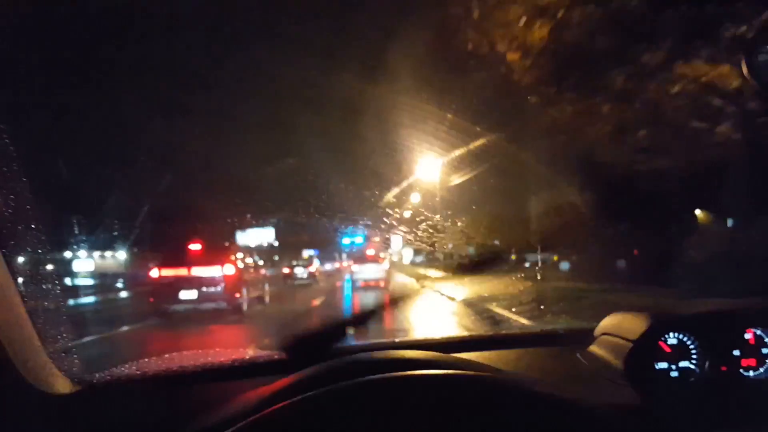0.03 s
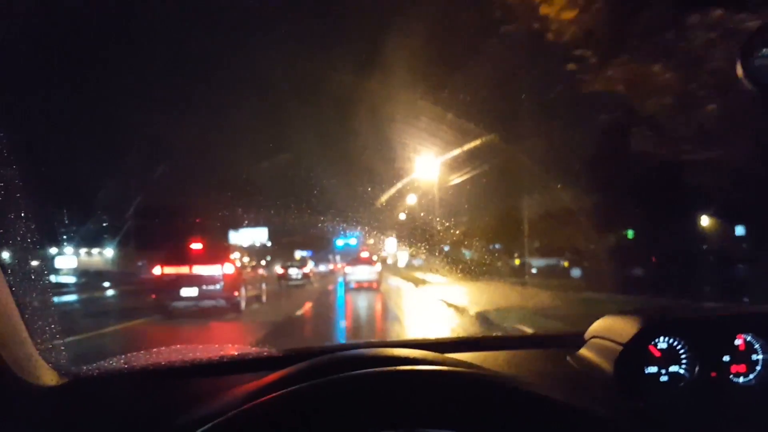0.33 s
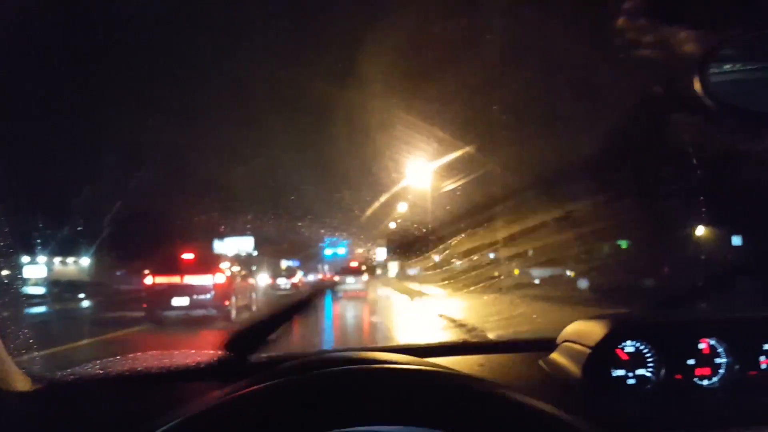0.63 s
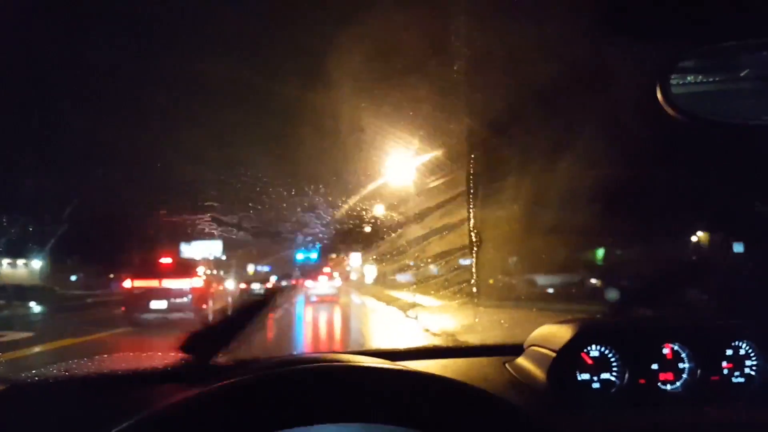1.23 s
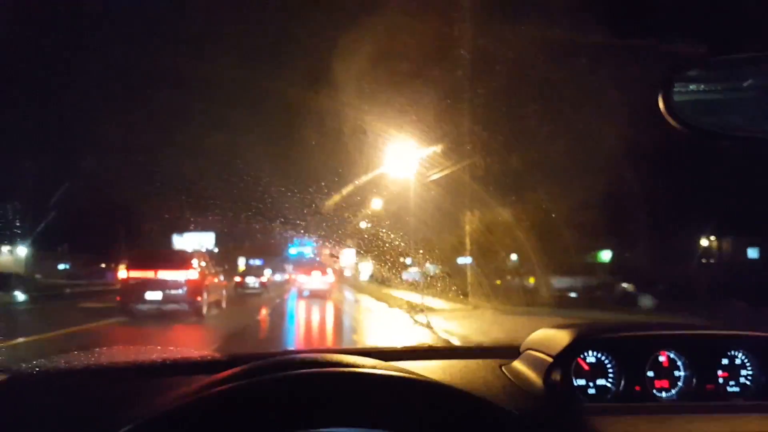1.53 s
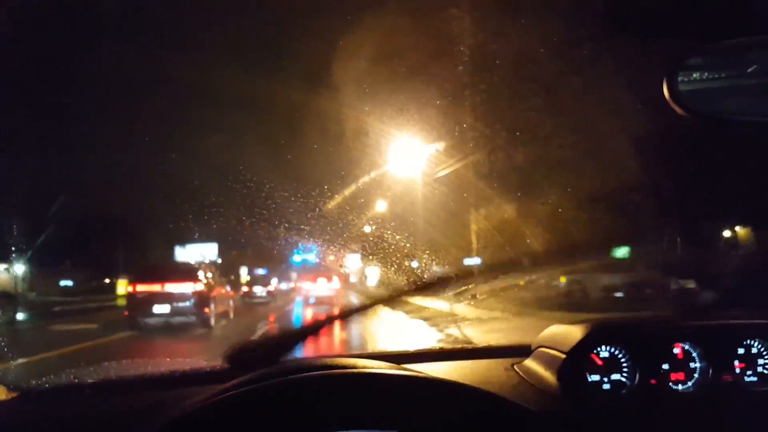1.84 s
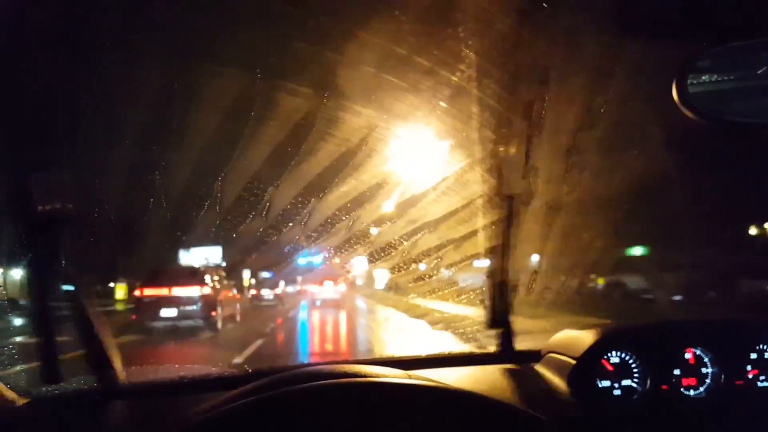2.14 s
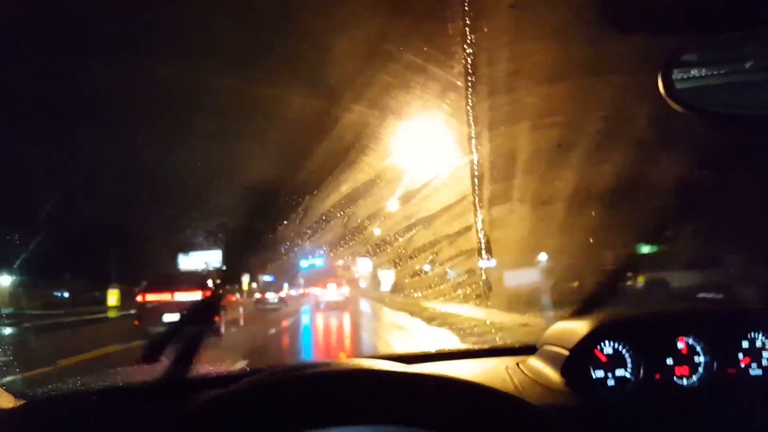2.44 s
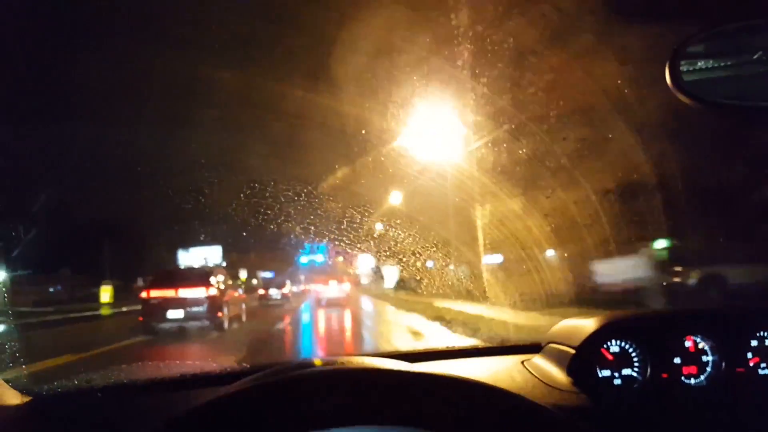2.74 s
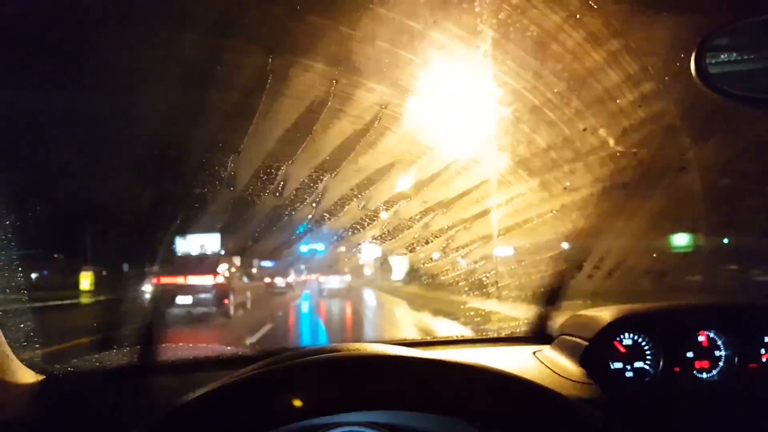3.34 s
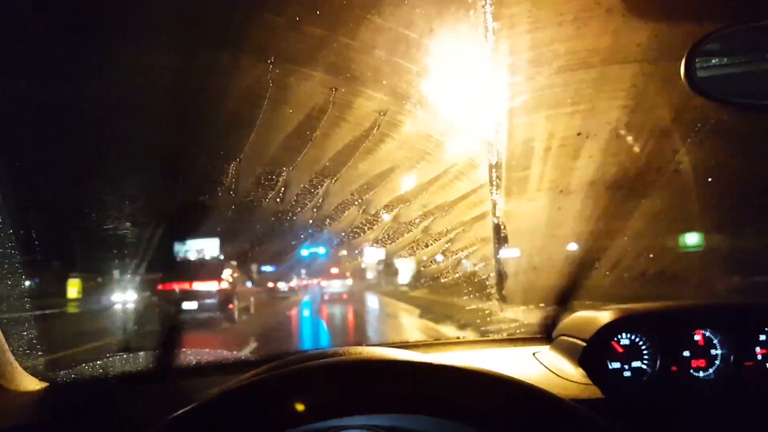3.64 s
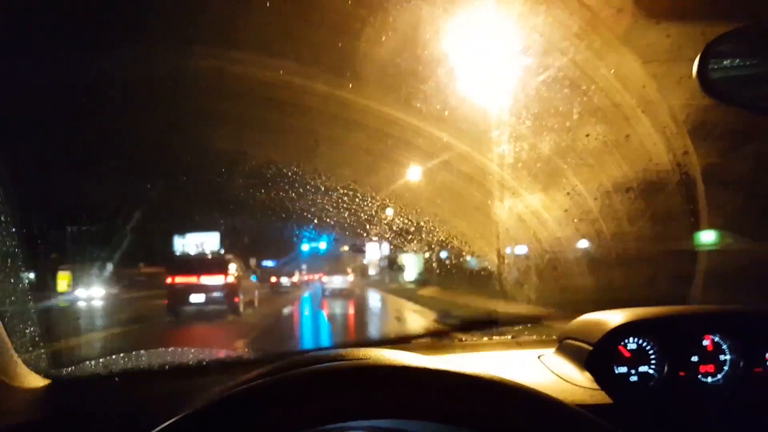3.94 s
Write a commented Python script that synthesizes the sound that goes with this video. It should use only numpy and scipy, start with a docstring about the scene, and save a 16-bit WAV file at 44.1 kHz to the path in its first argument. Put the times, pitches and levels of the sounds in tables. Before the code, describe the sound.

Wiper blades judder, hiss and thud across a wet windshield inside a moving car.

```python
"""Windshield wipers at arm's length, on a stereo microphone inside a car rolling slowly on a wet road.
Three sweeps, louder on the left: the rubber breaks loose with a stick-slip judder, hisses up the wet
glass, flutters, and thuds as the blades flip over at the top; the way back is almost silent.
Small squelches and water ticks lie between. Farther off, the engine's firing note drones and the
tyres rumble through the body. The sound fades in at the start."""
import sys
import numpy as np
from scipy import signal
from scipy.fft import rfft, irfft, next_fast_len
from scipy.io import wavfile
from scipy.ndimage import map_coordinates

SR = 44100
rng = np.random.default_rng(int(sys.argv[2]) if len(sys.argv) > 2 else 0)


def output_pcm(signal):
    """Save a mono or channel-first signal as 16-bit PCM at the path in sys.argv[1].

    Samples are clipped to [-1, 1] before scaling.
    """
    pcm = np.clip(np.atleast_2d(signal).T, -1, 1) * 32767
    wavfile.write(sys.argv[1], SR, np.round(pcm).astype(np.int16))


N = 176400
T = np.arange(N) / SR

# Sweeps across the glass in front of the microphone: start_s, gain_db
SWEEPS = [(.483, -0.5), (1.75, -1.5), (3.022, -1.5)]
# Rubbing along one sweep: after_start_s, hiss_gain_db, rub_gain_db
STROKE = [(-.04, -28, -12), (0, -12.5, -2.5), (.014, -1, 6), (.09, -6, 1.5), (.18, -7, 3.5),
          (.215, -3.5, 4), (.32, -4.5, 5.5), (.43, -9.5, 4), (.5, -6, 3), (.55, -2, 8.5), (.6, -15.5, 2.5),
          (.66, -24, -5.5), (.85, -24, -22.5)]
# The blade's lip sings downward as it gathers speed: after_start_s, length_s, from_hz, to_hz,
# width_hz, level_db
SWISHES = [(.008, .12, 3400, 2300, 1310, -42.5), (.19, .13, 2691, 1555, 523, -44),
           (0.331, .15, 2800, 2290, 650, -49)]
# Wet hiss and low rub of rubber on glass: frequency_hz, gain_db
HISS_SPECTRUM = [(300, -31), (900, 8.5), (1400, 3.5), (2000, 1), (2900, -2), (4000, -6), (6500, -12),
                 (8500, -21), (9800, -19.5), (11000, -30.5), (15500, -29.5)]
RUB_SPECTRUM = [(40, -23.5), (90, -1.5), (140, 2), (200, -1.5), (255, -10), (340, -8.5), (550, -11.5),
                (850, -21), (1020, -25.5), (1400, -26.5), (3000, -69)]
def rubbing():
    """Close up, the blades drag up wet glass: hiss, grit and a low rub, fluttering near the top."""
    flutter_hz, flutter_db, grits_per_s = 26.6, 2.5, 2000
    hiss_gain, rub_gain, swish = np.zeros(N), np.zeros(N), np.zeros((2, N))
    for start, db in SWEEPS:
        hiss_db, rub_db = curves(STROKE, start)
        crest = start + .42
        flutter = flutter_db * bell(crest, .06) * np.cos(2 * np.pi * flutter_hz * (T - crest))
        moving = amp(db) * gate(start - .1, 1.13, edge_s=.017)
        hiss_gain += moving * amp(hiss_db + flutter)
        rub_gain += moving * amp(rub_db + flutter / 2)
        for after, length, from_hz, to_hz, width_hz, level_db in SWISHES:
            glide = np.interp(T - start - after, [0, length], [from_hz, to_hz])
            swell = amp(db + level_db) * gate(start + after, length, edge_s=.0082)
            swish += swell * sing(glide, width_hz)
    drag = amp(1.67 * wobble(110))
    grit = (rng.random(N) < grits_per_s / SR) * rng.standard_normal((2, N))
    wet = amp(-36) * rush(HISS_SPECTRUM) + amp(-47) * spread(grit, HISS_SPECTRUM) + amp(-42) * chirps()
    rub = amp(-31.5) * rush(RUB_SPECTRUM)
    return drag * (hiss_gain * wet + swish + rub_gain * rub)


def chirps(per_s=190, centre_hz=2356, scatter_octaves=.25, width_s=.0031):
    """Tiny squeaks within the hiss, where the rubber catches on drier spots."""
    out, t = np.zeros((2, N + SR)), np.arange(SR // 30) / SR
    draws = np.c_[rng.random((2000, 3)), rng.standard_normal((2000, 2))]
    for when, phase_l, phase_r, pitch, loud in draws[:int(per_s * N / SR)]:
        hz = centre_hz * 2 ** (scatter_octaves * pitch)
        swell = amp(3.5 * loud) * np.exp(-.5 * ((t - t.mean()) / width_s) ** 2)
        cycles = hz * t + np.array([[phase_l], [phase_r]])
        at = int(when * N)
        out[:, at:at + len(t)] += swell * np.sin(2 * np.pi * cycles)
    return unit(out[:, :N])


# Resonances of the wiper arms, just outside the glass: pitch_hz, width_hz, gain_db
ARM_MODES = [(101.5, 28.6, 3.5), (186, 37.4, 1), (451.6, 167, -18)]
# Scrape of the rubber edge: frequency_hz, gain_db
SCRAPE_SPECTRUM = [(120, -21), (330, 1), (600, 6), (1050, 1), (1500, -15), (3000, -34.5), (7000, -22.5),
                   (15000, -52)]
def judder(slip_hz=57, length_s=.22):
    """The blades break loose with a kick, then stutter and shake the arms."""
    pulses, kick, scrape = np.zeros((3, N))
    for start, db in SWEEPS:
        loose = start + .01
        train = slips(loose + 1 / slip_hz, length_s, slip_hz, scatter=.14, uneven_db=2.5)
        pulses += amp(db) * train * amp(-14 * np.abs(T - start))
        kick[round(loose * SR)] = amp(db)
        scrape += amp(db - 30) * dying(loose, t60_s=.07)
    active_share = len(SWEEPS) * length_s * SR / N
    stutter = amp(-24.5) * unit(ring(pulses, ARM_MODES)) * np.sqrt(active_share)
    thump = ring(kick, ARM_MODES)
    return stutter + amp(-13) * thump / np.abs(thump).max() + scrape * rush(SCRAPE_SPECTRUM)


# Blades flipping at the top of the glass: start_s, length_s, level_db, slip_hz
FLIPS = [(.95, 0.05, -21, 180), (1.015, 0.031, -21.5, 175), (1.059, 0.039, -22.5, 345),
         (2.222, 0.035, -17.5, 160), (2.28, 0.025, -21, 170), (2.312, 0.035, -16.5, 160),
         (3.494, 0.029, -16.5, 173), (3.562, .035, -14, 173), (3.597, .024, -20, 330)]
# Resonances of the windshield: pitch_hz, width_hz, gain_db
GLASS_MODES = [(157.6, 26, 0), (192, 28.6, -0.5), (304, 32.5, -4.5), (358, 59, -12.5), (452, 39, -11),
               (617, 94, -21.5), (1052, 69, -22)]
# After-ring of the dashboard, below the microphone: frequency_hz, gain_db
DASHBOARD_SPECTRUM = [(100, -29), (170, 15.5), (240, -5), (320, -1.5), (480, -15), (700, -26.5),
                      (1500, -50)]
def flips():
    """Each blade rolls over its edge in a burst of slips that booms in the windshield."""
    pulses, force, tail = np.zeros((3, N))
    for start, length, db, hz in FLIPS:
        pulses += amp(db) * slips(start, length, hz, scatter=.08, uneven_db=.7) / np.sqrt(hz)
        force += amp(db) * gate(start, length, edge_s=.01)
        tail += amp(db - 11) * dying(start + length / 2, t60_s=.28)
    boom = unit(ring(pulses, GLASS_MODES)) * np.sqrt(np.mean(force ** 2))
    return boom + amp(-16.5) * force * rush(SCRAPE_SPECTRUM) + tail * rush(DASHBOARD_SPECTRUM)


# Small squelches on the glass: peak_s, width_s, tone_db, pitch_hz, hiss_db
SQUELCHES = [(1.098, 0.014, -55, 2967, -45), (1.162, 0.0085, -54, 2685, -47.5),
             (1.213, 0.0091, -45.5, 2300, -49.5), (1.656, 0.0096, -46, 2525, -49.5),
             (1.694, 0.0093, -59, 2980, -59), (1.835, .008, -42.5, 3320, -56.5),
             (1.953, 0.0081, -44, 2550, -57.5), (2.425, 0.0085, -66, 2400, -44.5),
             (2.472, 0.01, -53, 2305, -45.5), (2.925, 0.0098, -42.5, 2602, -43),
             (3.098, 0.0044, -32.5, 2876, -53), (3.647, 0.011, -48.5, 2900, -42)]
def squelches(sag_hz_per_s=24000, width_hz=570):
    """The wet rubber catches briefly, each catch sliding down in pitch."""
    tone, hiss, glide = np.zeros((3, N))
    for peak, width, tone_db, hz, hiss_db in SQUELCHES:
        sag = sag_hz_per_s * np.clip(T - peak, -2 * width, 2 * width)
        glide = np.where(T > peak - 3 * width, hz - sag, glide)
        tone += amp(tone_db) * bell(peak, width)
        hiss += amp(hiss_db) * bell(peak, width)
    voice = sing(glide, width_hz) + amp(-13.5) * sing(2 * glide, width_hz)
    return tone * voice + hiss * rush(HISS_SPECTRUM)


# Knocks at the foot of the windshield: start_s, level_db
KNOCKS = [(1.648, -33.5), (2.921, -33.5)]
def knocks():
    """The arms knock softly and ring as they turn at the bottom."""
    return sum(amp(db) * dying(start, t60_s=.1) for start, db in KNOCKS) * sing(1100, width_hz=140)


# Water ticks, close on the glass: start_s, level_db, centre_hz, width_octaves
TICKS = [(.69, -44, 6000, .5), (.815, -40.5, 6500, .5), (.828, -45, 7050, 0.48), (1.092, -43.5, 6050, 0.31),
         (1.506, -36, 2300, .6), (1.578, -57, 7000, .4), (1.594, -52, 6500, .4), (1.801, -50, 6000, 0.29),
         (1.84, -52, 7000, 0.63), (1.954, -37, 6000, 0.52), (1.976, -41, 5960, .6),
         (2.021, -43, 6500, 0.31), (2.0767, -39.5, 7000, .7), (2.338, -50, 5900, .6),
         (2.864, -52, 6400, .35), (2.888, -51.5, 6560, 0.42), (3.073, -44, 5500, 0.31),
         (3.224, -40.5, 6500, 0.45), (3.2474, -42.5, 6474, 0.46), (3.602, -41, 6000, 0.33),
         (3.6415, -42, 4950, 0.43)]
def ticks(t60_s=.013):
    """Drops snap under the blades, each a fast-dying band of noise."""
    out, size = np.zeros((2, N + SR)), 4096
    t, f = np.arange(size) / SR, np.fft.rfftfreq(size, 1 / SR) + 1
    for start, db, hz, octaves in TICKS:
        band = np.exp(-.5 * (np.log2(f / hz) / octaves) ** 2)
        snap = unit(irfft(rfft(rng.standard_normal((2, size))) * band))
        at = round(start * SR)
        out[:, at:at + size] += amp(db) * 1000 ** (-t / t60_s) * snap
    return out[:, :N]


# A faint puff of spray outside: peak_s, width_s, level_db
SPRAY = [(2.413, 0.023, -55)]
# Its bright colour: frequency_hz, gain_db
SPRAY_SPECTRUM = [(2000, -20), (5000, 4), (9000, 0), (14000, -3), (16000, -19)]
def spray():
    """Water thrown off the blade hisses for a moment."""
    return sum(amp(db) * bell(peak, width) for peak, width, db in SPRAY) * rush(SPRAY_SPECTRUM)


# Drone from beyond the dashboard, centred between the channels: time_s, level_db
ENGINE_LEVEL = [(.7, -28.5), (.8, -24.5), (.95, -32), (1.3, -30.5), (1.45, -30), (1.96, -31), (2.06, -28.5),
                (2.26, -30.5), (3.0, -26), (3.39, -31.5), (3.67, -26.5), (4.0, -31.5)]
# Firing rate: time_s, pitch_hz
FIRING_PITCH = [(1.3, 46.5), (1.45, 47.75), (1.96, 48.23), (2.06, 46)]
# Overtones of the firing note: multiple, gain_db
OVERTONES = [(2, -17), (3, -18.5)]
def engine():
    """The firing note booms in the cabin, never quite even, with weak, unsteady overtones."""
    (db,), (hz,) = curves(ENGINE_LEVEL), curves(FIRING_PITCH)
    phase = 2 * np.pi * np.cumsum(hz * (1 + .0082 * wobble(13))) / SR
    upper = sum(amp(gain_db + 5.3 * wobble(12)) * np.sin(k * phase + .84 * wobble(9))
                for k, gain_db in OVERTONES)
    return np.sqrt(2) * amp(db + 1.5 * wobble(20)) * (np.sin(phase) + upper)


# Tyres on the wet road, heard from inside: frequency_hz, gain_db
ROAD_SPECTRUM = [(40, -19), (70, -10.5), (98, 2), (125, -1.5), (165, -0.5), (195, -7), (240, -15.5),
                 (300, -15.5), (390, -18.5), (450, -23.5), (660, -25), (790, -23), (900, -27.5),
                 (1550, -37.5), (2600, -42), (6000, -52.5), (15000, -71)]
# Rise and fall of the rumble, scaled down by swell_depth: time_s, contour_db
ROAD_SWELL = [(0.8, -30), (2.35, -25), (2.71, -39), (3.39, -18.5), (4.0, -38.5)]
def road(swell_depth=.26):
    """Tyre rumble and faint wet hiss come through the body, a little to the left."""
    contour_db, = curves(ROAD_SWELL)
    bass_cut = [(20, -9), (67, -4), (100, 0)]  # frequency_hz, gain_db
    rumble = unit(filtered(rush(ROAD_SPECTRUM), lambda hz: amp(along(bass_cut, hz))))
    level_db = -28 + swell_depth * (contour_db - contour_db.mean()) + 1.5 * wobble(9)
    return amp([[.5], [-.5]]) * amp(level_db) * rumble


# How alike the cabin sounds on the microphone's two sides: frequency_hz, correlation
CABIN_LIKENESS = [(60, 1), (150, 0.98), (300, 0.84), (600, 0.76), (1200, 0), (2500, 0.082), (8000, 0)]
def spread(pair, spectrum):
    """Two unrelated signals coloured and mixed to the cabin's stereo width."""
    def response(hz):
        angle = np.arccos(np.clip(along(CABIN_LIKENESS, hz), -1, 1)) / 2
        return amp(along(spectrum, hz)) * [np.cos(angle), np.sin(angle)]
    mid, side = filtered(pair, response)
    return unit(np.array([mid + side, mid - side]))


def rush(spectrum):
    """Coloured stereo noise of rms 1."""
    return spread(rng.standard_normal((2, N)), spectrum)


def slips(start, length, hz, scatter, uneven_db):
    """Uneven stick-slip pulses of rubber on glass."""
    k = np.arange(int(length * hz) + 1)
    late, loud = rng.standard_normal((100, 2))[k].T
    times = start + (k + scatter * late) / hz
    return np.bincount(np.clip(times * SR, 0, N - 1).astype(int), amp(uneven_db * loud), N)


def ring(pulses, modes, rubber_hz=1500):
    """Pulses, dulled by the soft rubber, pass through a body's resonances."""
    def body(f):
        return sum((-1) ** k * amp(db) * 1j * f * width / (hz * hz - f * f + 1j * f * width)
                   for k, (hz, width, db) in enumerate(modes))
    return filtered(pulses, lambda f: body(f) / (1 + 1j * f / rubber_hz) ** 2)


def sing(hz, width_hz):
    """A rough resonance: a band of noise that follows a pitch."""
    phase = 2 * np.pi * np.cumsum(hz + 0 * T) / SR
    lowpass = signal.butter(2, width_hz / 2, fs=SR, output="sos")
    a, b = signal.sosfilt(lowpass, rng.standard_normal((2, 2, N)))
    return unit(a * np.cos(phase) + b * np.sin(phase))


def filtered(x, response):
    """x times a complex response of frequency."""
    size = next_fast_len(N + SR // 2)
    return irfft(rfft(x, size) * response(np.fft.rfftfreq(size, 1 / SR)), size)[..., :N]


def amp(db):
    """Decibels to gain."""
    return 10 ** (np.asarray(db) / 20)


def unit(x):
    """Scaled to rms 1."""
    return x / np.sqrt(np.mean(x ** 2) + 1e-20)


def along(points, hz):
    """Rows of frequency_hz, value joined on a log axis."""
    f, values = np.transpose(points)
    return np.interp(np.log(hz + 1), np.log(f + 1), values)


def curves(rows, start=0):
    """One value per sample for each column after the time."""
    times, *columns = np.transpose(rows)
    return [np.interp(T - start, times, column) for column in columns]


def wobble(rate):
    """A smooth random curve, rate knots a second."""
    return map_coordinates(rng.standard_normal(int(N * rate / SR) + 4), [T * rate])


def bell(peak, width):
    """A smooth swell around a moment."""
    return np.exp(-.5 * ((T - peak) / width) ** 2)


def gate(start, length, edge_s):
    """Rise, hold and fall."""
    return np.clip((T - start) / edge_s, 0, 1) * np.clip((start + length - T) / edge_s + .5, 0, 1)


def dying(start, t60_s):
    """A quick rise and an even decay."""
    age = np.maximum(T - start, 0)
    return (1 - np.exp(-age / .004)) * 10 ** (-3 * age / t60_s)


# The wipers' lean at the microphone: frequency_hz, left_minus_right_db
WIPER_LEAN = [(60, 1.5), (150, 3), (300, 3.5), (500, 1), (1000, 3), (2200, 4.5), (4000, 6), (7000, 10.5),
              (13000, 1)]
def scene():
    """From inside the cabin: near wipers, louder on the left, over engine and road."""
    wipers = rubbing() + judder() + flips() + squelches() + spray() + knocks() + ticks()
    sides = np.array([[.5], [-.5]])
    return filtered(wipers, lambda hz: amp(along(WIPER_LEAN, hz) * sides)) + engine() + road()


# The opening fade: time_s, gain_db
FADE_IN = [(0, -87), (.422, -61), (.436, -22.5), (.48, -14), (.52, -10.5), (.6, -5.5), (.68, 0), (.78, 0.5)]
def record(dry):
    """The microphone's signal fades in; nothing is kept above the band limit."""
    top_hz = 15830
    fade_db, = curves(FADE_IN)
    return filtered(dry * amp(fade_db), lambda hz: hz < top_hz)


dry = scene()
out = record(dry)
output_pcm(out)
```